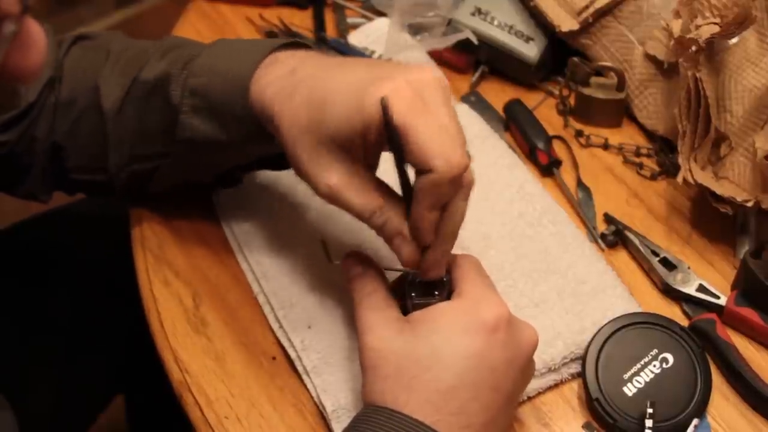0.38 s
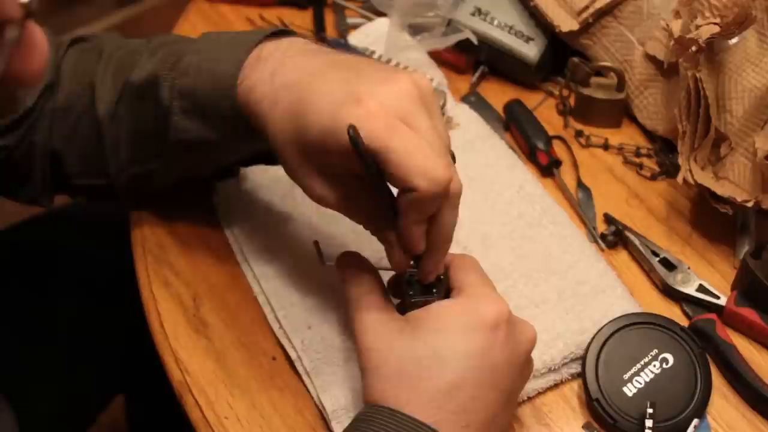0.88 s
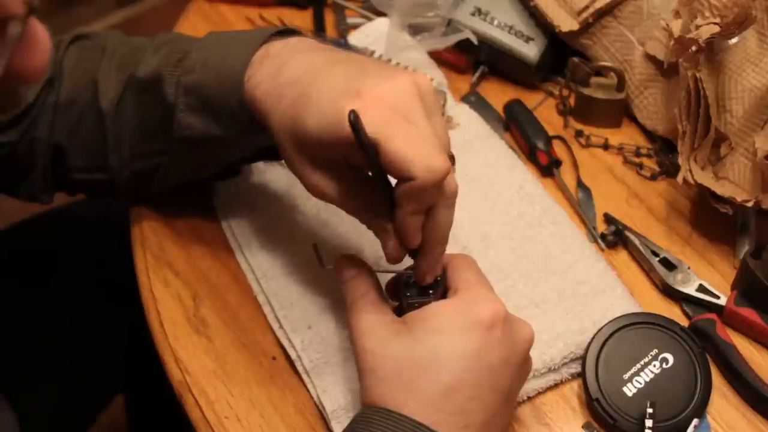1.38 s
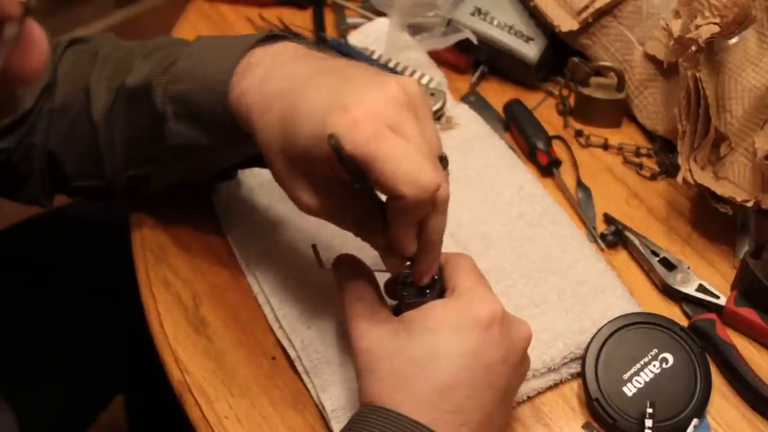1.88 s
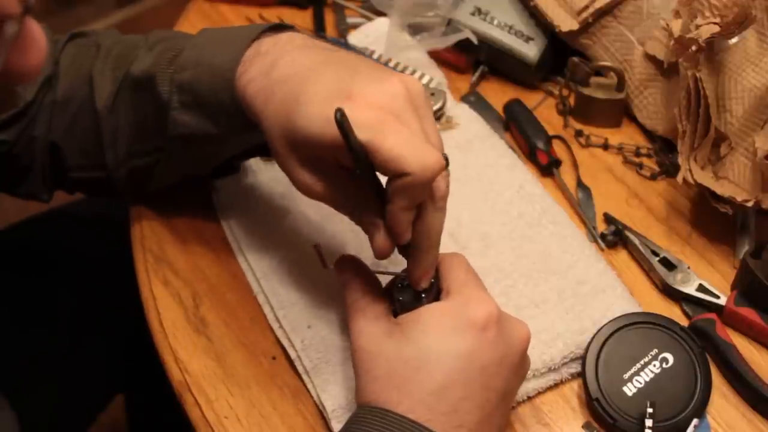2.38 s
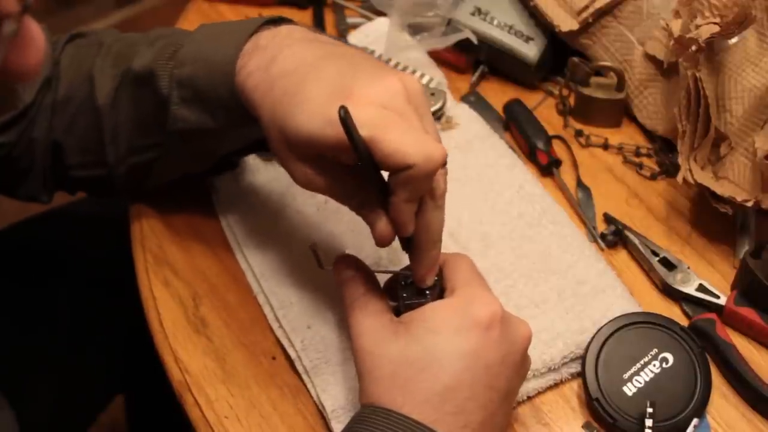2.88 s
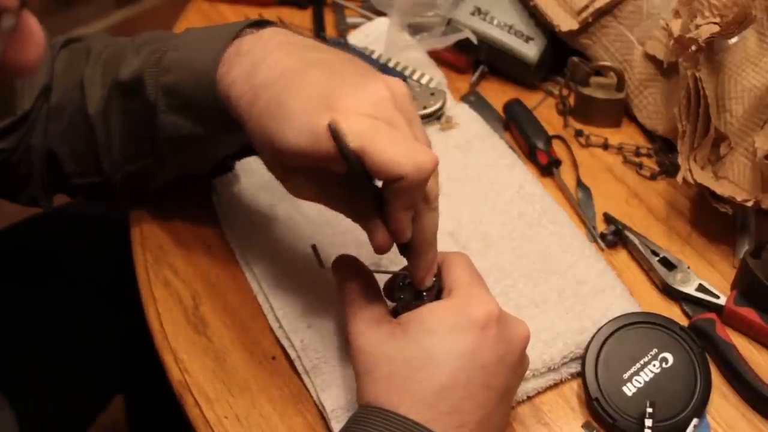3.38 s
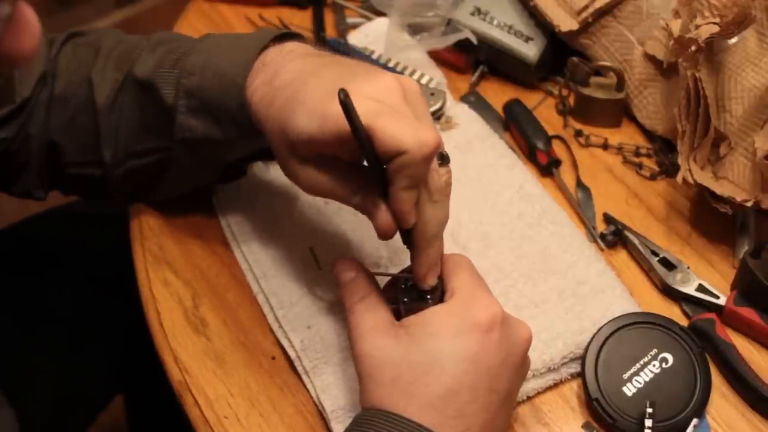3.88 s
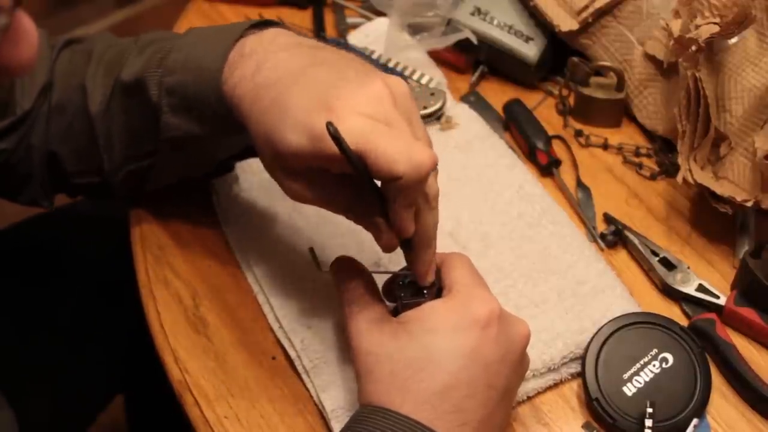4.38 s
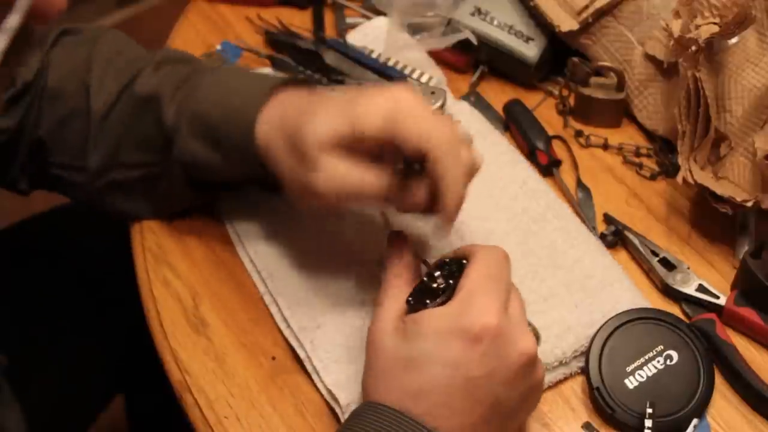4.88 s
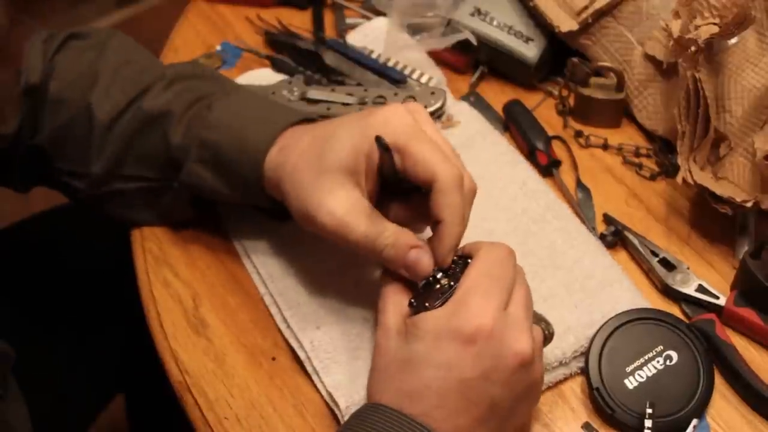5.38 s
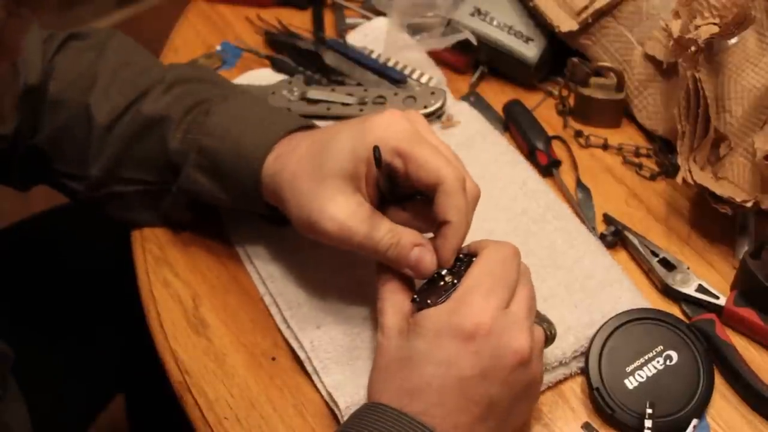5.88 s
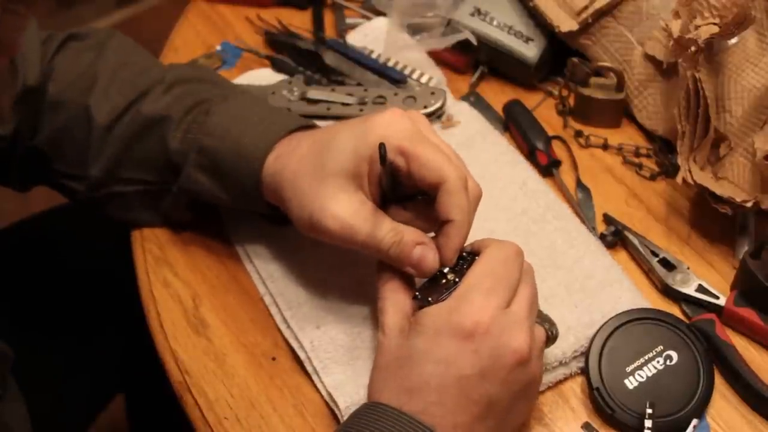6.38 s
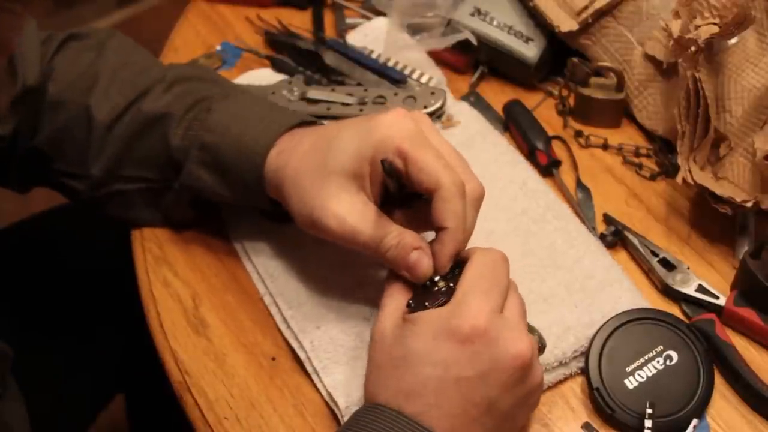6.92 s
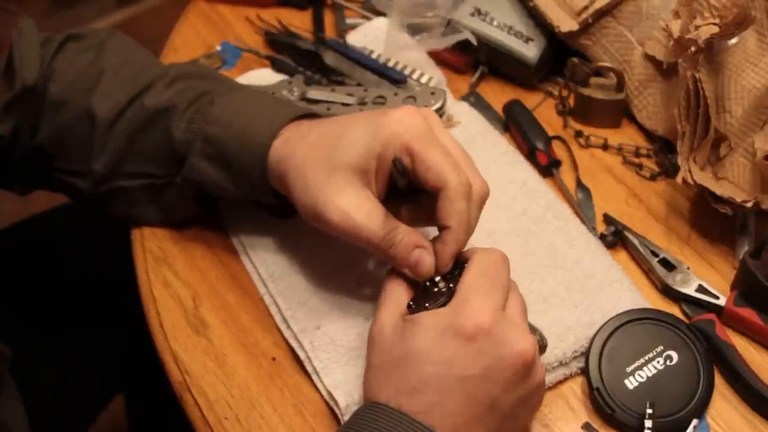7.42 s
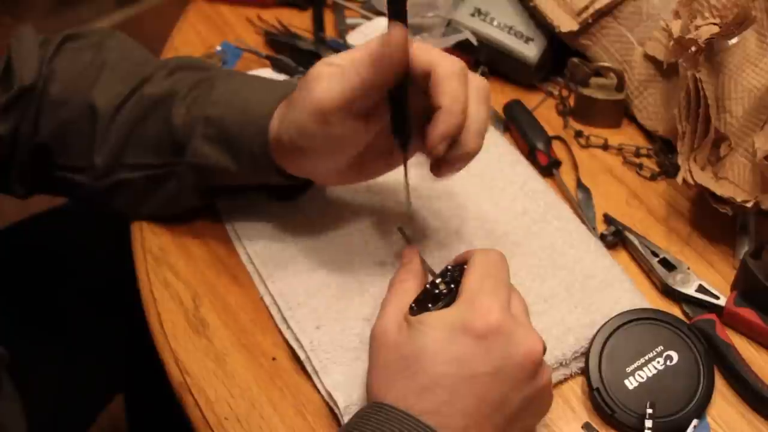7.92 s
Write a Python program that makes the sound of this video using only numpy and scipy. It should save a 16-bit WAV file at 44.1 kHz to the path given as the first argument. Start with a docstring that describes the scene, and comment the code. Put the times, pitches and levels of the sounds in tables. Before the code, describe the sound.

In a quiet, hard-walled room, a steel pick works the pins of a small lock held over a towel on a wooden table. A steady wavering low hum, thin motor whir and soft hiss run throughout. Around 0.4 s a quick cluster of small metallic ticks sounds. Loud, bright snaps follow at 1.1 and 1.3 s, a softer one at 1.45, the strongest and most rattling at 2.0, and another at 2.3, each with a short, lively echo. Faint ticks fill the gap until a sharp snap at 4.3 s. At 4.6 s several clicks crowd together with a very brief, faint scrape. Then it is sparse: faint ticks near 4.8, 5.0, 5.65 and 6.5 s, and a final clear snap at 7.7. Barely audible soft bumps come near 0.25, 2.5, 3.65, 4.9, 5.2 and 7.85 s. The microphone is close and centred, and the loudest clicks are slightly overloaded.

```python
"""Short bright clicks snap and echo, with a brief scrape and soft bumps, over hum, whir and hiss.
A steel pick works the pins of a small lock on a towel, on a wooden table in a quiet, hard-walled room.
Clicks and scrape are sharp forces ringing the lock's modes; bumps are noise pushes ringing the table.
Echoes are convolution with shaped noise. Whir, fan hum, air and hiss are filtered noise; the whir adds sines.
One microphone feeds both channels; its gain dips after loud clicks and recovers."""
import sys
import numpy as np
from scipy import signal
from scipy.fft import rfft, irfft, next_fast_len
from scipy.io import wavfile

SR = 44100
rng = np.random.default_rng(int(sys.argv[2]) if len(sys.argv) > 2 else 0)


def gain_from_db(level_db):
    """Turn a decibel level (scalar or array-like) into a linear amplitude factor."""
    decades = np.asarray(level_db, float) / 20
    return 10 ** decades


def log_audio(samples):
    """Write samples as a 16-bit WAV file to the path given in sys.argv[1]."""
    # one column per channel
    frames = np.atleast_2d(samples).T
    # limit to full scale, then quantise
    limited = np.clip(frames, -1, 1)
    pcm = np.round(limited * 32767).astype(np.int16)
    wavfile.write(sys.argv[1], SR, pcm)


N = 354211

# Pick on pins. Each row: time in seconds (the click starts 0.8 ms later), peak in dB,
# rattle after the touch in dB, lock body in dB and pick shank in dB against the pin.
PIN_CLICKS = [(0.3672, -30.5, -1, 2, -4), (0.3865, -37, -8, -25, -25), (0.4092, -21.5, -8, -8, -5),
              (0.4121, -22.5, 2.5, 4, -12), (0.4394, -14.5, 0, 20, 2), (0.5352, -37, -8, 10, -8),
              (1.1177, -1, -0.5, -10.5, -14), (1.2709, 0, -11, -18, -16), (1.4517, -20, -27, -8, -29),
              (1.6408, -38, -2, 17, 0), (1.7191, -31, -6, 1, -15), (1.9995, 3.5, 5.5, -12, -22),
              (2.2772, -37, -9, -20, -20), (2.3189, -6, -7.5, -14, -9.5), (2.4054, -38, -9.5, 22, 0),
              (2.937, -26.5, -1.5, 25, 14), (3.2395, -43, -3.5, 8, 8), (3.5494, -41, -6, -8, -10),
              (3.65, -39, -8, 18, 6), (4.2936, -7.5, -5, -7.5, -4), (4.5824, -35, -5, -8, -10),
              (4.6151, -22.5, -12, -12, -13), (4.6215, -30, -3, -15, 6), (4.6345, -17.5, 0.5, -13, 4),
              (4.6451, -18, -11.5, -20, 9), (4.7935, -34, 2.5, 8, -3), (4.9921, -37, 3, 8, -5),
              (5.6555, -29, -3.5, -2, -13), (5.6588, -33, 0, -4, -15), (6.519, -24.5, 2.5, 3, -23),
              (7.6589, -39, -9, -2, -8), (7.7211, -7.5, 2.5, 16, -5)]
# How each part takes up a touch. Each row: frequency in Hz, pin and spring in dB, lock body in dB,
# pick shank in dB.
PART_COLOURS = [(1940, -24, -1, -28), (2700, -20.5, -5.5, -32), (3950, -24, 0.5, -20.5),
                (5260, -14.5, -12.5, 7.5), (6260, -7, -7.5, -9), (7670, -8, -2.5, -19),
                (9400, -2.5, -12.5, -3), (11300, -2, -11, -18), (12730, 4.5, -21.5, -16.5),
                (14460, -4.5, -3.5, -21)]
# Modes of lock body and pick, damped by the fingers. Each row: frequency in Hz, width in Hz,
# relative level in dB per Hz of width.
LOCK_MODES = [(1900, 235, -1.5), (2590, 500, 0), (3790, 360, 2), (4210, 350, -0.5), (5227, 304, -2.5),
              (5930, 1000, -5.5), (7130, 1670, 5), (7810, 2340, 4.5), (8710, 1360, 2.5), (10040, 820, 1.5),
              (10710, 1100, 1), (12490, 1030, 3.5), (13310, 1200, 0.5), (14920, 710, 2.5),
              (15880, 1400, -7)]
# Lock and hand bumping on the towel. Each row: start in seconds, peak in dB, table ring in Hz,
# nominal t60 in seconds (each of two filter passes dies in half of it).
TOWEL_BUMPS = [(.25, -43, 475, 0.011), (2.515, -44.5, 475, 0.015), (3.65, -45.5, 430, 0.012),
               (4.88, -40.5, 217, 0.02), (5.175, -45, 477, 0.013), (7.85, -47.5, 420, 0.013)]
# First reflections. Each row: delay in ms, level in dB.
WALL_ECHOES = [(9.2, -30.5), (12.0, -23), (13.8, -29.5), (22.5, -36.5)]
# Decay of the room's tail. Each row: frequency in Hz, t60 in seconds.
TAIL_T60 = [(500, 0.73), (3000, 0.97), (8000, 0.49), (12000, 0.53), (14000, 0.363), (16000, 0.329)]
# Housing resonances of the motor whir. Each row: frequency in Hz, width in Hz per filter pass,
# level in dB rms.
HOUSING_MODES = [(1304, 230, -64), (1658, 98, -68), (2396, 87, -67), (2570, 390, -60.5), (3379, 141, -62.5),
                 (3499, 310, -57.5), (3960, 190, -69.5), (4593, 370, -64), (5230, 950, -66.5)]
# Motor tones. Each row: frequency in Hz, level in dB rms.
MOTOR_TONES = [(2277, -69.5), (2848, -72.5), (2869, -74), (3370, -75), (5739, -81)]
# Fan hum. Each row: frequency in Hz, width in Hz, level in dB rms.
FAN_HUM = [(119.8, 10, -67.5), (176.2, 4.9, -61), (278.2, 11, -61), (360, 14, -79), (420, 10.8, -72.5),
           (463.8, 11.8, -65.5)]
# Colour of room air and microphone hiss. Each row: frequency in Hz, relative level in dB per Hz.
AIR_COLOUR = [(20, -21.5), (50, -16), (110, -8), (200, -0.5), (400, -6.5), (800, -11.5), (1500, -12),
              (2000, -18.5), (3000, -23), (5000, -24.5), (8000, -27), (12000, -28.5), (16000, -30.5)]

# drag past the pins: it swells over the grip, holds over the slide, sinks while letting go
DRAG_START_S, GRIP_S, SLIDE_S, LET_GO_S = 4.605, 0.0094, 0.031, 0.02
DRAG_DB, DRAG_EDGE_DROP_DB = -45.5, 21
# dense scatter off hands, tools and table top
NEAR_DB, NEAR_T60_S = -22, 0.055
TAIL_DB, TAIL_RISE_S = -33, 0.00097     # noise level ahead of the band filters
AIR_DB_RMS = -51
MIC_TOP_HZ = 16200
LIMIT_DB, REDUCTION_DB_PER_DB, RELEASE_DB_PER_S, GAIN_LAG_S = -11, 0.37, 23, 0.0014
LOPSIDED = 0.063
SIDE_NOISE_DB = -74     # ahead of its band-pass


def rms_one(x):
    """Scale to unit rms."""
    return x / np.sqrt(np.mean(x ** 2) + 1e-20)


def at_hz(points, hz):
    """Read a table on a log-frequency axis."""
    points = np.array(points)
    return np.interp(np.log(hz + 1), np.log(points[:, 0]), points[:, 1])


def resonance(x, hz, width_hz):
    """Two-pole band-pass with gain 1 on top."""
    r = np.exp(-np.pi * width_hz / SR)
    feedback = [1, -2 * r * np.cos(2 * np.pi * hz / SR), r * r]
    return signal.lfilter([(1 - r * r) / 2, 0, (r * r - 1) / 2], feedback, x)


def drift(rate_hz):
    """Slow chance with rms 1: noise through a two-pole low-pass."""
    r = np.exp(-2 * np.pi * rate_hz / SR)
    slow = signal.lfilter([1], [1, -2 * r, r * r], rng.standard_normal(N + SR))
    return rms_one(slow[SR:])


def lock_ring(force, colour, strengths_db):
    """The force rings every mode of the lock; colour says how much energy each region takes up."""
    out = 0
    for k, (hz, width_hz, db) in enumerate(LOCK_MODES):
        gain = gain_from_db(db + at_hz(colour, hz) + strengths_db[k]) * np.sqrt(width_hz)
        out = out + (-1) ** k * gain * rms_one(resonance(force, hz, width_hz))
    return out


def clicks(scatter_db=1.5, chatter_ms_at_0_db=.9, chatter_db=-17, jolt_s=0.00081):
    """A sharp touch, then weaker micro-contacts; more rattle lasts longer and sends more into the room."""
    direct, sent, t = np.zeros(N), np.zeros(N), np.arange(600) / SR
    strengths_db = scatter_db * rng.standard_normal((len(PIN_CLICKS), len(LOCK_MODES)))
    chatter = gain_from_db(chatter_db) * rng.standard_normal((len(PIN_CLICKS), len(t)))
    hz = np.arange(len(t) // 2 + 1) * SR / len(t)
    part_hz, pin_db, body_colour_db, shank_colour_db = np.transpose(PART_COLOURS)
    push = np.sin(np.pi * np.minimum(t / jolt_s, 1)) ** 2
    for k, (s, peak_db, rattle_db, body_db, shank_db) in enumerate(PIN_CLICKS):
        parts = gain_from_db(pin_db) + gain_from_db(body_colour_db + body_db) + gain_from_db(shank_colour_db + shank_db)
        colour = np.transpose([part_hz, 20 * np.log10(parts)])
        decay_ms = chatter_ms_at_0_db * gain_from_db(rattle_db)
        force = (t == 0) + chatter[k] * gain_from_db(rattle_db / 2) * np.exp(-1000 * t / decay_ms)
        click = lock_ring(force, colour, strengths_db[k])
        # summed over all directions the modes blur into one smooth colour; so small a body radiates no bass
        spectrum = gain_from_db(at_hz(colour, hz)) / (1 + (1500 / (hz + 1)) ** 2)
        smooth = np.roll(irfft(spectrum), 16)
        i = round((s + .0008) * SR)
        here = slice(i, i + len(t))
        direct[here] += gain_from_db(peak_db) * click / np.abs(click).max()
        # the snap also jolts the whole lock against the table: one short low push
        direct[here] += gain_from_db(peak_db + 2 * rattle_db - 35.0) * push
        sent[here] += gain_from_db(peak_db + rattle_db) * smooth / np.abs(smooth).max()
    return direct, sent


def drag(ticks_per_s=4000, spread_db=12.0):
    """Dense uneven ticks ring the lock while the pick slides over the pin tips."""
    corners_s = DRAG_START_S + np.cumsum([0, GRIP_S, SLIDE_S, LET_GO_S])
    a, b = round(corners_s[0] * SR), round(corners_s[-1] * SR)
    heights_db = spread_db * np.minimum(rng.exponential(1, b - a), 3.0)
    ticks = (rng.random(b - a) < ticks_per_s / SR) * gain_from_db(heights_db) * rng.choice([-1, 1], b - a)
    colour = [(3500, -10.5), (5200, 0), (8000, -11), (13000, -1.0)]     # Hz, dB
    rub = lock_ring(ticks, colour, np.zeros(len(LOCK_MODES)))
    drop = np.interp(np.arange(a, b) / SR, corners_s, [1, 0, 0, 1])
    out = np.zeros(N)
    out[a:b] = gain_from_db(DRAG_DB - DRAG_EDGE_DROP_DB * drop) * rms_one(rub)
    return out


def bumps(rise_s=.008, push_s=.018):
    """A soft uneven push through cloth sets the table top ringing briefly."""
    out, t = np.zeros(N), np.arange(SR // 5) / SR
    envelope = (1 - np.exp(-t / rise_s)) * np.exp(-t / push_s)
    for s, peak_db, hz, t60_s in TOWEL_BUMPS:
        push = rng.standard_normal(len(t)) * envelope
        width_hz = 2 * np.log(1000) / (np.pi * max(t60_s, .005))
        thud = resonance(resonance(push, hz, width_hz), hz, width_hz)
        i = round(s * SR)
        out[i:i + len(t)] += (gain_from_db(peak_db) * thud / np.abs(thud).max())[:N - i]
    return out


def room(x, smear_s=0.00038):
    """Near scatter, smeared wall reflections, and a dense tail that dies band by band."""
    t = np.arange(SR) / SR
    tail = np.zeros(SR)
    edges_hz = np.geomspace(200, 18000, num=14)
    for low, high in zip(edges_hz, edges_hz[1:]):
        band_pass = signal.butter(2, [low, high], "band", fs=SR, output="sos")
        band = signal.sosfilt(band_pass, rng.standard_normal(SR))
        tail += gain_from_db(TAIL_DB - 60 * t / at_hz(TAIL_T60, np.sqrt(low * high))) * band
    tail *= 1 - np.exp(-t / TAIL_RISE_S)
    early = gain_from_db(NEAR_DB - 60 * t / NEAR_T60_S)
    for ms, db in WALL_ECHOES:
        early += gain_from_db(db) * np.exp(-((t - ms / 1000) / smear_s) ** 2)
    response = tail + early * rng.standard_normal(SR)
    return signal.fftconvolve(x, response)[:N]


def motor(slow_db=0.2, flutter_db=3.5):
    """Uneven gear noise in the housing's resonances, steep-sided, plus thin tones."""
    unevenness_db = slow_db * drift(2.6) + flutter_db * drift(50)
    source = rng.standard_normal(N) * gain_from_db(unevenness_db)
    out = np.zeros(N)
    for hz, width_hz, db in HOUSING_MODES:
        out += gain_from_db(db) * rms_one(resonance(resonance(source, hz, width_hz), hz, width_hz))
    t = np.arange(N) / SR
    for hz, db in MOTOR_TONES:
        out += gain_from_db(db) * np.sqrt(2) * np.sin(2 * np.pi * hz * t + 0.7 * drift(2.2))
    return out


def fan_hum():
    """One noise in narrow resonances gives wavering hum tones."""
    white = rng.standard_normal(N)
    return sum(gain_from_db(db) * rms_one(resonance(white, hz, width_hz)) for hz, width_hz, db in FAN_HUM)


def air():
    """Smooth room air and hiss: noise shaped in the spectrum."""
    size = next_fast_len(N)
    colour = gain_from_db(at_hz(AIR_COLOUR, np.arange(size // 2 + 1) * SR / size))
    shaped = irfft(rfft(rng.standard_normal(size)) * colour, size)[:N]
    return gain_from_db(AIR_DB_RMS) * rms_one(shaped)


def scene():
    """One microphone feeds both channels."""
    direct, sent = clicks()
    handling = drag() + bumps()
    mono = direct + handling + room(sent + handling) + motor() + fan_hum() + air()
    return np.array([mono, mono])


def roll_off(x):
    """The treble ends steeply here."""
    return signal.sosfilt(signal.butter(12, 15800, fs=SR, output="sos"), x)


def record(dry):
    """Gain control dips and recovers; loud clicks overload lopsidedly and clip."""
    dry = signal.sosfilt(signal.butter(3, MIC_TOP_HZ, fs=SR, output="sos"), dry)
    fall_db = RELEASE_DB_PER_S * np.arange(N) / SR
    level_db = 20 * np.log10(np.abs(dry[0]) + 1e-9)
    over_db = REDUCTION_DB_PER_DB * np.maximum(level_db - LIMIT_DB, 0)
    held_db = np.maximum(np.maximum.accumulate(over_db + fall_db) - fall_db, 0)
    r = np.exp(-1 / (GAIN_LAG_S * SR))
    mix = dry * gain_from_db(-signal.lfilter([1 - r], [1, -r], held_db))
    mix = mix + LOPSIDED * mix ** 2      # the even term adds a low thump under the loudest clicks
    # faint separate band-passed noise is added to each channel
    mix = mix + gain_from_db(SIDE_NOISE_DB) * resonance(rng.standard_normal((2, N)), 2290, 5260)
    mix = np.clip(mix, -1, 1)
    return roll_off(mix)


dry = scene()
out = record(dry)
log_audio(out)
```